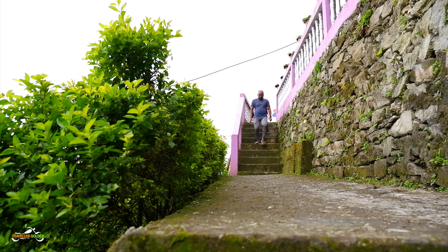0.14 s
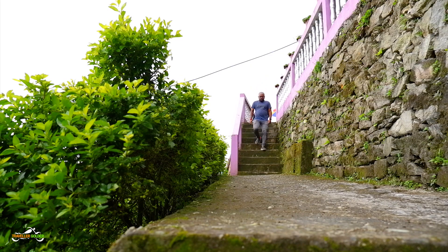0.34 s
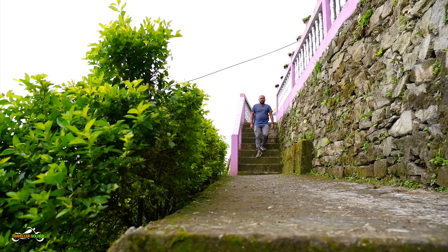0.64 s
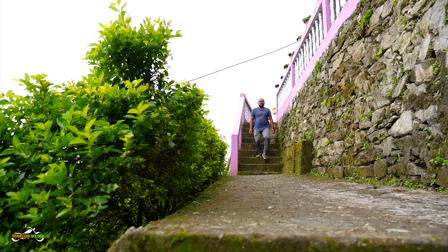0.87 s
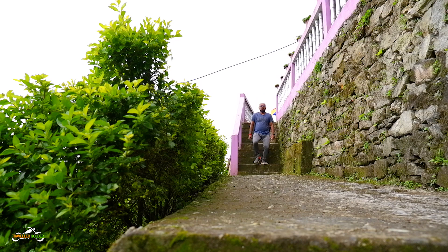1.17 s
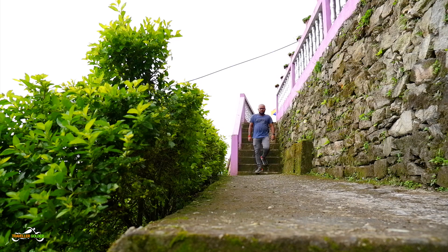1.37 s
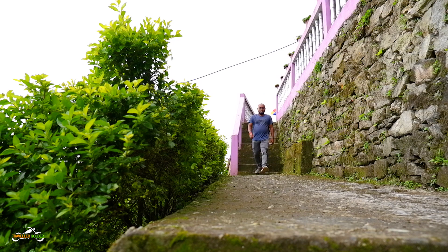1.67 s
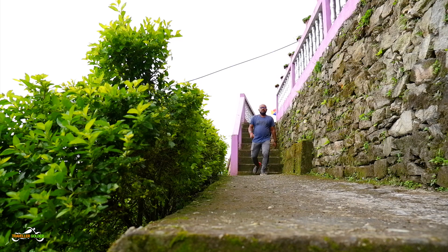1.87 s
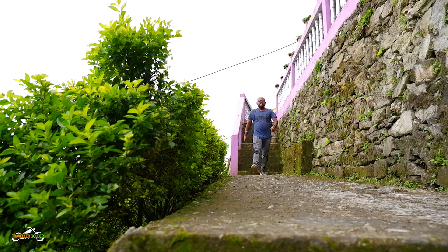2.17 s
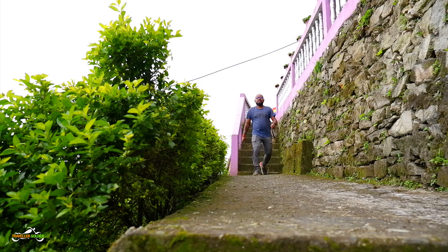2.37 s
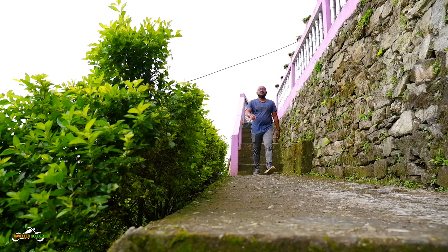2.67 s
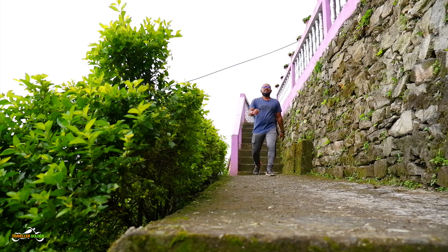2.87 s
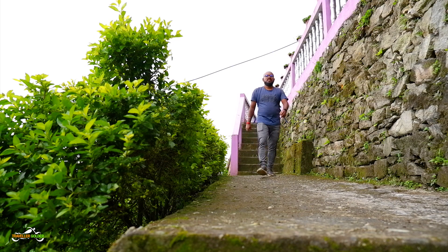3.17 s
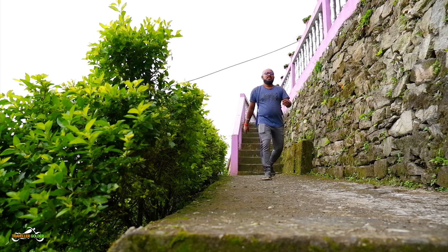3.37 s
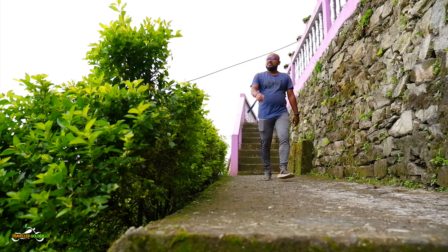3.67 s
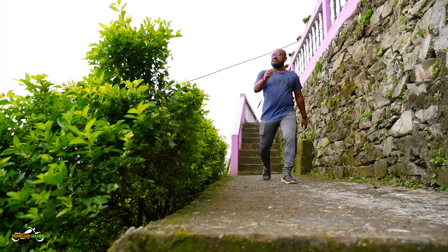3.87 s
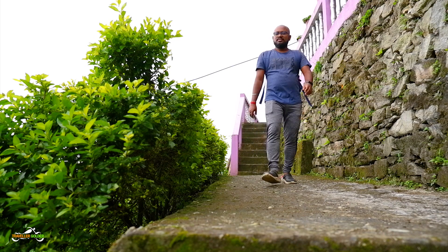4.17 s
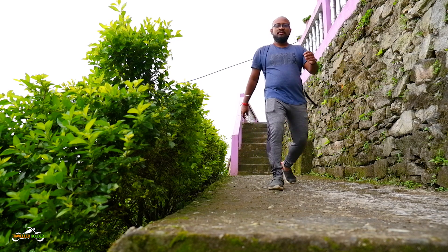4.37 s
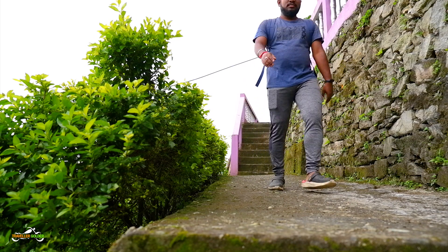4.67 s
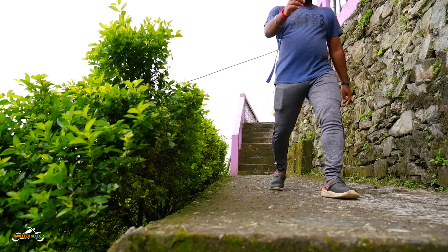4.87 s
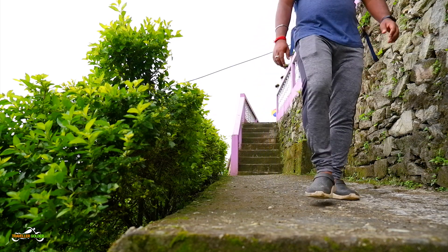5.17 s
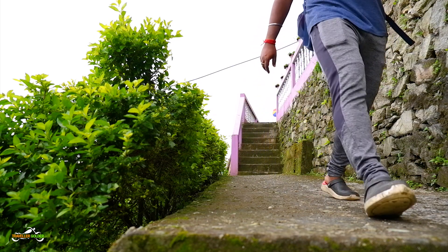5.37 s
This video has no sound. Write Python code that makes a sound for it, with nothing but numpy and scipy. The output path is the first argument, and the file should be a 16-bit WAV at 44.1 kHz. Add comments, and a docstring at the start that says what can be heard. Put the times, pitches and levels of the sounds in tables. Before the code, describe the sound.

Shrill cicadas buzz outdoors as one person's shoes approach over stone and grit, growing louder, with a single far-off cow moo early on.

```python
"""Cicadas sing from the outset in quick pairs of falling chirps, ribs ringing in turn, over a noise chorus.
Almost at once a man comes down stone stairs, then along a gritty path towards a microphone near the ground:
ringing slaps, heel knocks, bursts of crunching grains and single snapping stones.
A cow moos once further down the hill: harmonics coloured by her throat, echoing between the walls.
Faint village rumble, made of filtered noise, lies far behind."""
import sys
import numpy as np
from scipy import signal
from scipy.fft import rfft, irfft
from scipy.io import wavfile
from scipy.ndimage import uniform_filter1d

SR = 44100
rng = np.random.default_rng(int(sys.argv[2]) if len(sys.argv) > 2 else 0)


def digitize_waveform(pressure):
    """Quantize a signal to 16-bit integers and store it at the path in sys.argv[1].

    Rows of a 2-D input are taken as channels; values are limited to [-1, 1].
    """
    field = np.atleast_2d(pressure).T
    bounded = np.clip(field, -1, 1)
    quanta = np.round(bounded * 32767).astype(np.int16)
    wavfile.write(sys.argv[1], SR, quanta)


N = 243413
TIME = np.arange(N) / SR


def undb(db):
    """Decibels to gain."""
    return 10 ** (np.asarray(db) / 20)


def unit(x):
    """Scale to rms 1."""
    return x / np.sqrt(np.mean(x ** 2))


def gain_at(hz, spectrum):
    """Gain of a (f/Hz, level/dB) spectrum at the given frequencies."""
    f, db = np.transpose(spectrum)
    return undb(np.interp(np.log(np.maximum(hz, 1)), np.log(f), db))


def colour(x, spectrum):
    """Give a steady sound a spectrum, at rms 1."""
    gain = gain_at(np.fft.rfftfreq(len(x), 1 / SR), spectrum)
    return unit(irfft(rfft(x) * gain, len(x)))


def band(x, lo_hz, hi_hz, order=2):
    """Causal band-pass."""
    edges = [lo_hz, min(hi_hz, SR / 2 - 1000)]
    return signal.sosfilt(signal.butter(order, edges, "band", fs=SR, output="sos"), x)


def noise(size=N):
    """White noise."""
    return rng.standard_normal(size)


def walk(rate):
    """Smooth random wandering at rms 1, about `rate` turns a second."""
    k = max(int(SR / rate), 1)
    steps = noise()[np.arange(N) // k]
    return unit(uniform_filter1d(uniform_filter1d(steps, k), k))


def fade(t, t60):
    """Exponential decay, 60 dB down after t60 seconds."""
    return np.exp(-np.log(1000) * t / t60)


def hump(s, half_s):
    """A smooth rise to 1 at time s and back."""
    return np.exp(-((TIME - s) / half_s) ** 2)


def resonance(hz, centre_hz, width_hz):
    """Gain of a resonance-shaped peak, 1 at its centre."""
    return 1 / np.sqrt(1 + (2 * (hz - centre_hz) / width_hz) ** 2)


def add(out, s, sound):
    """Mix a short sound in at time s."""
    i = int(s * SR)
    if 0 <= i < N:
        out[i:i + len(sound)] += sound[:N - i]


def scatter(x, t60, lo_hz, hi_hz):
    """Diffuse return from stone walls and foliage: a decaying noise tail."""
    t = TIME[:SR]
    tail = band(noise(SR), lo_hz, hi_hz) * fade(t, t60) * (1 - np.exp(-t / 0.0033))
    return signal.fftconvolve(x, tail / np.linalg.norm(tail))[:N]


# colour of the open air, far behind everything: (f/Hz, level/dB)
AIR_COLOUR = [(20, -11), (60, -12), (87, -4.5), (115, -3.5), (180, -1.5), (230, -2), (290, -2.5),
              (390, -7.5), (800, -9), (1600, -14), (3200, -18.5), (6000, -17), (9000, -30), (15000, -56)]
AIR_FLUTTER_DB = 1.3


def village():
    """Soft air and a wavering low drone with a fainter overtone, from far away."""
    air = colour(noise(), AIR_COLOUR) * undb(-45.0 + .5 * walk(2.6) + AIR_FLUTTER_DB * walk(14))
    drone = unit(band(noise(), 79.3, 92.6)) * undb(-55.0 + 2 * walk(1.94))
    overtone = unit(band(noise(), 274, 303.0)) * undb(-64.0 + 2 * walk(1.23))
    return air + drone + overtone


# colour of the distant insects on the hillside: (f/Hz, level/dB)
CHORUS_COLOUR = [(3900, -36), (4400, -4), (4800, 0.5), (5300, 2.5), (5700, -1.5), (6100, -14), (6600, -1.5),
                 (7150, -4), (7450, -12), (7800, -28), (10000, -63)]
# their shrill side swells and sinks in slow waves
CHORUS_WAVE_DB, WAVE_DEPTH_DB, WAVE_CREST_S, WAVE_PERIOD_S = -53.5, 2, 1.33, 2.8


def chorus():
    """Distant insects blur into a flickering noise, with a shrill narrow band that comes in waves."""
    steady = colour(noise(), CHORUS_COLOUR) * undb(-46.0 + .5 * walk(1.0) + 2.1 * walk(120))
    wave = np.cos(2 * np.pi * (TIME - WAVE_CREST_S) / WAVE_PERIOD_S)
    shrill_db = CHORUS_WAVE_DB + WAVE_DEPTH_DB * wave + 2.0 * walk(130)
    return steady + unit(band(noise(), 6950, 7420, order=3)) * undb(shrill_db)


# ribs of the tymbal, buckling in turn: (delay t/s, ring f/Hz before each insect's tuning, level/dB)
RIBS = [(.0006, 5230, -8), (.0028, 5000, -1), (.0058, 4980, -2.5), (.0076, 4800, 1.5)]
RIB_SCATTER_DB = 1.2
# the cicadas falter now and then, one tymbal clicking: (t/s, half length t/s, near one's level change/dB)
FALTERS = [(1.464, 0.1, -12), (4.288, 0.082, 0)]
# chirp pairs a second (before an insect's haste), their slow drift, and the scatter of each pair
PAIRS_PER_S, DRIFT_PER_S, PAIR_JITTER_S = 22.9, 1.4, .0008


def tymbals(tune, haste=1, sag=1.7, gap=.0168, ring=0.0049):
    """Two tymbals click in turn, the second resting in a falter; each rib rings lower than the last."""
    cycles = haste * np.cumsum(PAIRS_PER_S + DRIFT_PER_S * walk(3)) / SR
    chance = rng.standard_normal((160, 2, len(RIBS), 3))
    late, start = noise(len(chance)), rng.random()
    t = TIME[:int(ring * SR)]
    swell = np.sin(np.pi * t / ring) ** 2
    falling_t = t * (1 + sag * (ring - t))  # each ring sags in pitch
    out = np.zeros(N)
    for k in range(min(int(cycles[-1]), len(chance))):
        s = np.searchsorted(cycles, k + start) / SR + PAIR_JITTER_S * late[k]
        faltering = any(abs(s - middle) < half for middle, half, _ in FALTERS)
        for side in range(1 if faltering else 2):
            for (delay, hz, rib_db), (detune, size, turn) in zip(RIBS, chance[k, side]):
                phase = 2 * np.pi * hz * tune * (1 + 0.0062 * detune) * falling_t + np.pi * turn
                click = undb(rib_db + RIB_SCATTER_DB * size) * swell * np.sin(phase)
                add(out, s + side * gap + delay, click)
    return out


# a second cicada joins in bouts: (start t/s, end t/s, level/dB)
BOUTS = [(0, 0.764, -31), (1.43, 1.953, -30.5), (2.77, 3.506, -31.5), (5.005, 5.52, -34)]
BOUT_FADE_S = 0.16
NEAR_DB = -27.5  # the near cicada, outside its falters


def cicadas():
    """Two cicadas nearby and a shriller, faster one that soon stops, with a short diffuse return."""
    near = tymbals(tune=1.0113) * undb(NEAR_DB + sum(db * hump(s, half) for s, half, db in FALTERS))
    bouts = np.zeros(N)
    for start, end, db in BOUTS:
        corners = [start - BOUT_FADE_S, start, end, end + BOUT_FADE_S]
        bouts += undb(db) * np.interp(TIME, corners, [0, 1, 1, 0])
    second = tymbals(tune=1.025) * bouts
    shrill = tymbals(tune=1.58, haste=2.4) * undb(np.interp(TIME, [.25, .29], [-46, -120]))
    song = near + second + shrill
    return song + undb(-19.0) * scatter(song, 0.15, 3100, 10200)


# the moo is one arch of pitch: it starts, tops out and ends; a higher power flattens the top
MOO_START_S, MOO_TOP_S, MOO_END_S = .88, 1.53, 2.11
START_HZ, TOP_PITCH_HZ, END_HZ, ARCH_POWER = 134.1, 171.35, 118.7, 2.75
# its level rises from near silence, holds with a slight swell and is released
MOO_DB, SWELL_DB_PER_S, SILENT_DB, ATTACK_S, RELEASE_S = -30.5, 4, -20.5, .16, .15
# the mouth opens early in the call and brightens it, and the voice eases briefly as it does
OPEN_S, OPEN_HALF_S, OPEN_BRIGHT_DB, CLOSED_BRIGHT_DB = 1.255, 0.14, 3, -1
EASE_S, EASE_HALF_S, EASE_DB = 1.196, .045, -3
# a last push: louder and duller; around then the voice turns pressed (fundamental weak)
PUSH_S, PUSH_HALF_S, PUSH_DB, PUSH_DULL_DB = 1.91, 0.047, 3.5, 6
PRESS_S, PRESS_RISE_S, PRESSED_DB = 1.82, 0.022, 12
CLEAR_ROUGH, SLACK_ROUGH = 0.073, 0.57  # roughness 0-1 throughout, and added as the pitch falls


def moo_gesture():
    """Pitch, level, roughness, brightness and pressing over one call: open, hold, push, go slack."""
    rise = np.clip((MOO_TOP_S - TIME) / (MOO_TOP_S - MOO_START_S), 0, 1) ** ARCH_POWER
    fall = np.clip((TIME - MOO_TOP_S) / (MOO_END_S - MOO_TOP_S), 0, 1) ** ARCH_POWER
    hz = TOP_PITCH_HZ + (START_HZ - TOP_PITCH_HZ) * rise + (END_HZ - TOP_PITCH_HZ) * fall
    attack, release = (TIME - MOO_START_S) / ATTACK_S, (MOO_END_S - TIME) / RELEASE_S
    held = np.clip(np.minimum(attack, release), 0, 1)
    push = hump(PUSH_S, PUSH_HALF_S)
    db = MOO_DB + SWELL_DB_PER_S * (TIME - MOO_TOP_S) + SILENT_DB * (1 - held)
    db = db + EASE_DB * hump(EASE_S, EASE_HALF_S) + PUSH_DB * push
    bright_db = CLOSED_BRIGHT_DB + OPEN_BRIGHT_DB * hump(OPEN_S, OPEN_HALF_S) - PUSH_DULL_DB * push
    pressed_db = PRESSED_DB * (1 + np.tanh((TIME - PRESS_S) / PRESS_RISE_S)) / 2
    return hz, db, CLEAR_ROUGH + SLACK_ROUGH * fall, bright_db, pressed_db


# the cow's throat and nose: (f/Hz, level/dB)
THROAT = [(90, 13), (160, 2), (310, 3), (400, -7.5), (560, 0), (690, -14), (880, -4.5), (1150, -8),
          (1360, -14.5), (1560, -6), (1800, -8.5), (2050, -16), (2420, -16), (2700, -24), (4500, -48)]
# a narrow emphasis that shifts between the moo's harmonics, as echoes reinforce them: (t/s, f/Hz)
EMPHASIS = [(1.0, 950), (1.146, 940), (1.252, 840), (1.4, 880), (1.504, 1010), (1.604, 1000), (1.676, 820),
            (1.802, 955), (2.06, 950)]
EMPHASIS_WIDTH_HZ, EMPHASIS_DB = 49, 10.5
# walls that return the moo: (delay t/s, level/dB)
WALL_ECHOES = [(.037, -11.5), (.083, -17), (.17, -20)]


def cow():
    """Vocal folds drive the throat, with a shifting emphasis on single harmonics; rougher as pitch sags."""
    hz, db, rough, bright_db, pressed_db = moo_gesture()
    wobble = 0.0018 * walk(25.1) + 0.022 * rough * walk(110)
    phase = 2 * np.pi * np.cumsum(hz * (1 + wobble)) / SR
    emphasis_hz = np.interp(TIME, *np.transpose(EMPHASIS))
    voice, power = 0, 0
    for k in np.arange(1, 23):  # harmonics
        tilt_db = bright_db * np.clip(np.log2(k) / 2, 0, 2) - pressed_db * (k == 1)
        gain = gain_at(k * hz, THROAT) * undb(tilt_db)
        gain = gain * (1 + (undb(EMPHASIS_DB) - 1) * resonance(k * hz, emphasis_hz, EMPHASIS_WIDTH_HZ))
        voice = voice + gain * np.cos(k * phase + rng.uniform(0, 4.3))
        power = power + gain ** 2 / 2
    # air rushes through once a cycle
    rush = colour(noise(), THROAT[1:])
    rush = unit(band(rush, 310, 5000) + 2.4 * band(rush, 980, 990)) * (1 + np.cos(phase))
    # strong and weak cycles alternate when the folds are slack
    unevenness = 1 + rough * (0.2 * np.cos(phase / 2) + .5 * walk(70))
    voice = voice / np.sqrt(power) * unevenness + 0.78 * rough * rush
    sounding = uniform_filter1d(1. * ((TIME > MOO_START_S) & (TIME < MOO_END_S)), size=800)
    call = voice * undb(db) * sounding
    # sound that bends round the walls comes back without its bass
    upper = band(call, 900, 4600, order=1)
    echoes = sum(undb(echo_db) * np.interp(TIME - delay, TIME, upper) for delay, echo_db in WALL_ECHOES)
    return call + echoes + undb(-11.5) * scatter(call, 0.6, 430, 2150)


# trouser legs brush between steps: delay after the heel, half length, level re the step's grit
SWISH_AFTER_S, SWISH_HALF_S, SWISH_DB = 0.4, 0.23, -28.5


def trousers():
    """Cloth brushes softly as one leg swings past the other."""
    swing = np.zeros(N)
    for s, _, _, _, _, grit_db, _, _, _ in PATH_STEPS:
        swing += undb(grit_db + SWISH_DB) * hump(s + SWISH_AFTER_S, SWISH_HALF_S)
    return swing * unit(band(noise(), 1000, 4100, order=1)) * undb(2 * walk(90))


# a soft low bump ahead of or under a footfall: (t/s, length t/s, f/Hz, level/dB)
BUMPS = [(1.473, 0.14, 52.4, -47), (3.895, 0.066, 125.4, -29)]


def thump():
    """Soft low bumps of a few cycles."""
    out = np.zeros(N)
    for s, length, hz, db in BUMPS:
        u = np.clip((TIME - s) / length, 0, 1)
        envelope = np.sqrt(np.abs(np.sin(np.pi * u))) * (1 - u / 2)
        out += undb(db) * envelope * np.sin(2 * np.pi * hz * (TIME - s))
    return out


# single stones snapping under a sole: (t/s, approximate peak level/dB, f/Hz)
STONE_SNAPS = [(0.878, -20.5, 7840), (1.192, -23, 3000), (2.406, -24, 3000), (2.524, -17, 2650),
               (2.939, -8, 2980), (4.013, -12.5, 3786), (4.057, -9, 1900), (4.445, -9, 5140),
               (4.468, -3, 6200), (4.5108, -3.5, 3500), (4.562, -12, 3000), (5.031, -13, 2480)]


def stones(crest_db=11.5):
    """Single stones snap under the weight: short decaying bands of noise."""
    out, t = np.zeros(N), TIME[:SR // 10]
    for s, db, hz in STONE_SNAPS:
        snap = unit(band(noise(len(t)), hz * 0.58, hz * 1.25)) * fade(t, 0.02)
        add(out, s, undb(db - crest_db) * snap)
    return out


# shoe and trapped air ringing together: (multiple of the hollow ring, t60 t/s, level/dB)
SOLE_MODES = [(.66, 0.0066, -18), (1, 0.014, 4), (1.2, 0.0031, 1), (1.55, 0.015, -8)]
SOLE_DETUNE = .015  # random spread of each mode, as a fraction


def slap(db, hz, crack_db, thud_db):
    """A sole slaps stone: a hollow ring, a rattle, a crack and a thud."""
    t = TIME[:SR // 10]
    ring = np.zeros(len(t))
    for ratio, t60, mode_db in SOLE_MODES:
        mode_hz = hz * ratio * (1 + SOLE_DETUNE * rng.standard_normal())
        ring += undb(mode_db) * fade(t, t60) * np.sin(2 * np.pi * mode_hz * t)
    ring = 0.65 * band(ring, hz * .5, hz * 1.74, order=3)
    rattle = 0.31 * unit(band(noise(len(t)), hz * 0.84, hz * 1.4, order=3)) * fade(t, 0.038)
    crack = 0.38 * undb(crack_db) * unit(band(noise(len(t)), 2600, 5300)) * fade(t, 0.054)
    thud = 0.54 * undb(thud_db) * unit(band(noise(len(t)), 170, 510)) * fade(t, 0.03)
    onset = 1 - np.exp(-t / 0.00062)
    return undb(db) * (ring + rattle + crack + thud) * onset


# colour of a heel: (f/Hz, level/dB)
HEEL_COLOUR = [(25, -22), (70, -16), (220, -3.5), (550, 0.5), (1000, -1.5), (2000, -12.5), (4500, -10),
               (8000, -20), (15000, -48)]
HEEL_HZ = 570


def heel(db, knock_db=-6, thud_db=-4):
    """A heel lands with a dull knock and a short thud."""
    t = TIME[:SR // 10]
    knock = undb(knock_db) * colour(noise(len(t)), HEEL_COLOUR) * fade(t, 0.039)
    thud = undb(thud_db) * np.sin(2 * np.pi * HEEL_HZ * t) * fade(t, 0.016)
    return undb(db) * (knock + thud)


# colour of crunching grit: (f/Hz, level/dB)
GRIT_COLOUR = [(100, -14), (300, -12.5), (600, -4), (1100, -3.5), (1700, 0), (2700, -3.5), (4000, -2),
               (5500, -5.5), (7500, -15.5), (10000, -26), (15000, -70)]


def scuff(rise_s, fall_s, db, bright_db, hz, edge_db=12, lift_db=22, grain_db=3.5, crowd_db=3.0, ring_db=6):
    """Grains of grit crack in crowds as the weight rolls on to a sole and off again."""
    t = TIME[:SR // 3]
    crowds = np.repeat(noise(len(t)), 96)[:len(t)]  # a shared loudness for each 96 samples
    sizes_db = crowd_db * np.minimum(crowds, 1) + grain_db * np.minimum(rng.exponential(size=len(t)), 3.5)
    grains = np.sign(noise(len(t))) * (rng.random(len(t)) < .04) * undb(sizes_db)
    crunch = unit(band(colour(grains, GRIT_COLOUR), hz * 0.079, 16000, order=1))
    # a harder scrape adds treble; the gap under the sole rings
    sharp = crunch - signal.sosfiltfilt(signal.butter(1, 2500, fs=SR, output="sos"), crunch)
    hollow = band(crunch, hz * 0.99, hz * 1.015, order=1)
    scrape = unit(crunch + (undb(bright_db) - 1) * sharp + undb(ring_db) * hollow)
    weight_db = np.interp(t, [0, rise_s, rise_s + fall_s], [-edge_db, 0, -lift_db])
    contact = uniform_filter1d(1. * (t < rise_s + fall_s), size=200, mode="constant")
    return contact * undb(db + weight_db) * scrape


# flat steps down the stairs: (t/s, slap level/dB, hollow ring f/Hz, crack level/dB re the slap,
# slide level/dB)
STAIR_STEPS = [(0.0741, -11.5, 1230, -33, -38), (.452, -11.5, 1415, -25, -40),
               (0.8124, -14, 1340, -12, -34.5), (1.1499, -11.5, 1470, -11.5, -42),
               (1.4831, -10.5, 1600, -14, -42)]
# each thuds (dB re the slap), then the shoe slides a little on the tread
STAIR_THUD_DB, SLIDE_AFTER_S, SLIDE_BRIGHT_DB, SLIDE_HZ = -6.5, .065, -13, 1600


def stairs(rise_s=0.022, fall_s=0.041):
    """On the stairs the foot comes down flat, then slides a little."""
    out = np.zeros(N)
    for s, db, hz, crack_db, slide_db in STAIR_STEPS:
        add(out, s, slap(db, hz, crack_db, STAIR_THUD_DB))
        slide = scuff(rise_s, fall_s, slide_db, SLIDE_BRIGHT_DB, SLIDE_HZ)
        add(out, s + SLIDE_AFTER_S - rise_s, slide)
    return out


# heel-to-toe steps on the path: (heel lands t/s, sole lands t/s later, toe grinds t/s after the heel,
# heel level/dB, slap level/dB, grit level/dB, toe level/dB, grit brightness level/dB, hollow ring f/Hz)
PATH_STEPS = [(1.901, 0.044, 0.095, -40, -34, -33, -37, -1, 2180),
              (2.395, .072, 0.15, -37, -20.5, -33.5, -37, 0, 1084),
              (2.918, 0.03, 0.14, -31, -17, -23.5, -33, 0.5, 1833),
              (3.445, 0.06, 0.12, -20, -3, -25.5, -35.5, -5, 1397),
              (3.9317, 0.066, 0.13, -19, -33, -25, -30.5, -3, 1240),
              (4.437, .06, .125, -14, -8, -20, -30.5, -6, 1019),
              (4.9481, 0.054, .15, -17, -17.5, -24, -30, 3, 1124),
              (5.492, 0.019, 0.11, -15.5, -34, -27.5, -30, -4, 1300)]
SOLE_THUD_DB = -3  # the sole's thud is set against the heel's level
# grit crunches on after the sole is down; the toe gives a shorter scrape
CRUNCH_S, TOE_RISE_S, TOE_FALL_S, TOE_BRIGHT_DB, TOE_HZ = 0.06, .035, 0.016, 3.5, 1900


def path(crack_db=-7):
    """On the path the heel lands, grit crunches as the sole slaps down, and the toe grinds last."""
    out = np.zeros(N)
    for s, sole_s, toe_s, heel_db, slap_db, grit_db, toe_db, bright_db, hz in PATH_STEPS:
        add(out, s, heel(heel_db))
        add(out, s, scuff(sole_s, CRUNCH_S, grit_db, bright_db, hz))
        thud_db = heel_db + SOLE_THUD_DB - slap_db  # slap() takes it re the slap
        add(out, s + sole_s, slap(slap_db, hz, crack_db, thud_db))
        toe = scuff(TOE_RISE_S, TOE_FALL_S, toe_db, TOE_BRIGHT_DB, TOE_HZ)
        add(out, s + toe_s - TOE_RISE_S, toe)
    return out


def walker():
    """All sounds of the walking man; the stone wall gives them a short tail."""
    steps = trousers() + thump() + stones() + stairs() + path()
    return steps + undb(-21.0) * scatter(steps, 0.16, 320, 3600)


def scene():
    """Everything, from far to near, arrives alike in both channels."""
    return np.tile(village() + chorus() + cicadas() + cow() + walker(), (2, 1))


TOP_HZ = 15780


def record(dry):
    """Each microphone channel adds its own faint hiss; the top is cut steeply."""
    hiss = undb(-47.5) * rng.standard_normal((2, N))
    return signal.sosfilt(signal.ellip(10, .2, 80, TOP_HZ, fs=SR, output="sos"), dry + hiss)


dry = scene()
out = record(dry)
digitize_waveform(out)
```